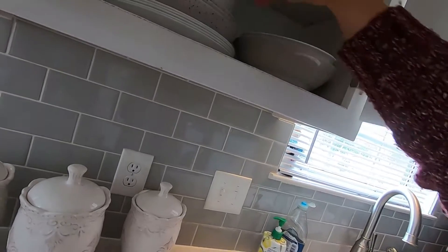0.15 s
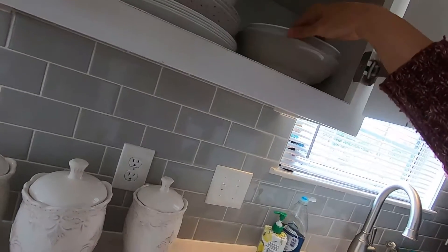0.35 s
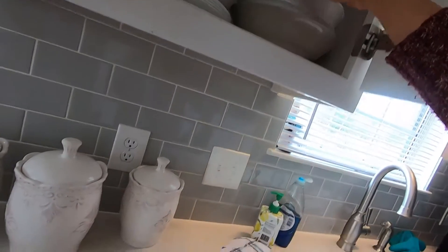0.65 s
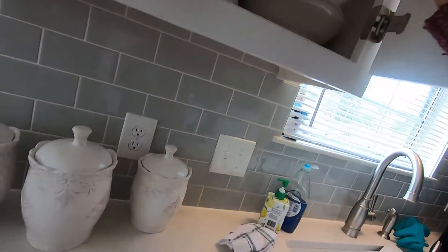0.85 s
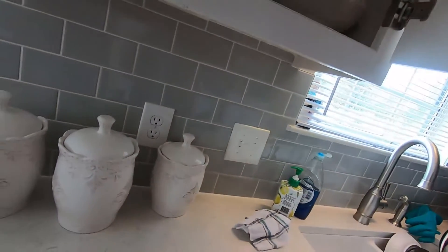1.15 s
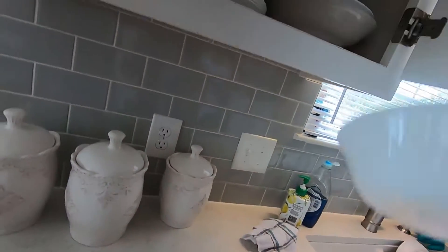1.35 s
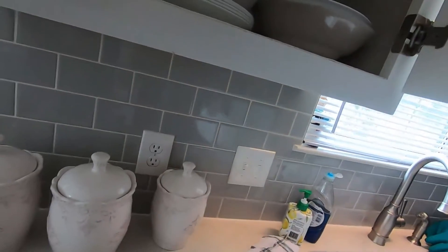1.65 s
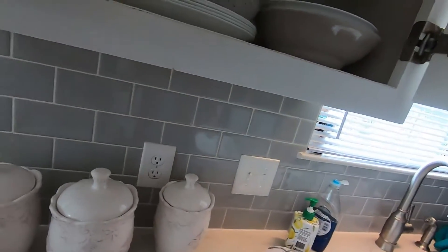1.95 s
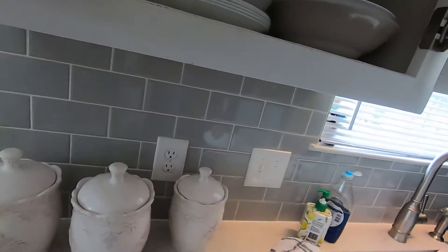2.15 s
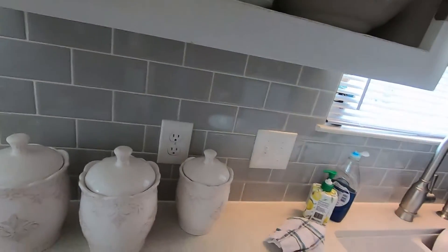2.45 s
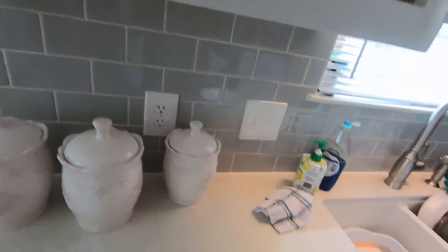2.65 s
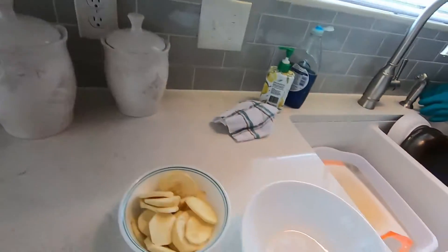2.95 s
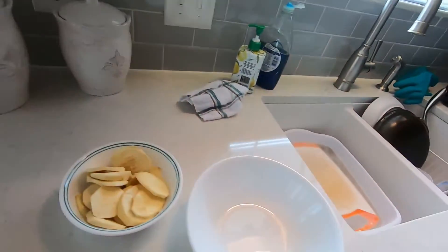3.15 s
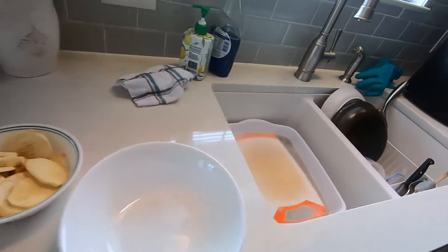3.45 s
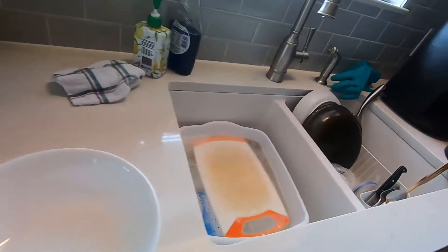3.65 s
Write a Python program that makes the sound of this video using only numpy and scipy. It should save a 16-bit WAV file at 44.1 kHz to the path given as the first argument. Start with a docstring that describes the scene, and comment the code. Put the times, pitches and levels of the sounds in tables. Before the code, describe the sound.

Ceramic crockery clinks on a shelf following hard wooden door clacks, pauses with faint handling ticks, rattles down on a countertop, then a hinge clicks and the cabinet door bangs, close up in a small reflective kitchen.

```python
"""Cabinet door, ceramic bowl and counter

A kitchen cabinet door clacks open; a ceramic bowl scrapes and clinks out of its stack and rings as it comes free.
After faint handling ticks, crockery chatters and clunks down on the counter, leaving one thin tone behind.
Something rumbles softly, a hinge clicks and the door thuds shut. Blows are coloured noise bursts plus damped
modes, answered by a small tiled room; booms are low modes; air, rubbing, rumble and drone are shaped noise."""
import sys
import numpy as np
from scipy import signal
from scipy.fft import rfft, irfft, next_fast_len
from scipy.io import wavfile

SR = 44100
rng = np.random.default_rng(int(sys.argv[2]) if len(sys.argv) > 2 else 0)


def materialize(psi):
    """Save the field psi as 16-bit PCM at rate SR to the path in sys.argv[1].

    A 1-D psi becomes a single channel; in a 2-D psi each row is a channel.
    """
    bounded = np.clip(np.atleast_2d(psi).T, -1, 1)
    quanta = np.round(bounded * 32767).astype(np.int16)
    wavfile.write(sys.argv[1], SR, quanta)


N = 167580  # samples


def amp(db):
    """Decibels to gain."""
    return 10 ** (np.asarray(db) / 20)


def unit(x):
    """Scale to rms 1."""
    return x / np.sqrt(np.mean(x ** 2) + 1e-20)


def along(points, hz):
    """Read (f/Hz, value) points on a log frequency axis."""
    f, v = np.transpose(points)
    return np.interp(np.log(hz + 1), np.log(f + 1), v)


def swell(rows):
    """Gain per sample from (t/s, level/dB) rows, silent outside them."""
    s, db = np.transpose(rows)
    return amp(np.interp(np.arange(N) / SR, s, db, left=-np.inf, right=-np.inf))


def add(track, s, sound):
    """Mix a sound into the track from time s."""
    i = max(0, round(s * SR))
    track[:, i:i + sound.shape[-1]] += sound[..., :max(0, N - i)]


def noise(colour, alike, size, tilt_db_per_oct=0):
    """Random-phase stereo noise of rms 1; the mid/side mix sets the left-right likeness per frequency."""
    hz = np.fft.rfftfreq(size, 1 / SR)
    turn = np.arccos(np.clip(along(alike, hz), -1, 1)) / 2
    octaves = np.log2(np.maximum(hz, 300))  # no tilt below 300 Hz
    gain = amp(along(colour, hz) + tilt_db_per_oct * octaves)
    spin = np.exp(2j * np.pi * rng.random((2, len(hz))))
    mid, side = irfft(spin * gain * [np.cos(turn), np.sin(turn)], size)
    return unit(np.array([mid + side, mid - side]))


def placed(x, side):
    """Lean each frequency of a sound to the left or right by level."""
    size = 2 * x.shape[-1]
    lean_db = along(side, np.fft.rfftfreq(size, 1 / SR)) / 2
    return irfft(rfft(x, size) * amp([lean_db, -lean_db]), size)[:, :x.shape[-1]]


# room decay: f/Hz, t60/s
ROOM_DECAY = [(150, 0.49), (700, 0.41), (2000, 0.44), (5000, 0.36), (10000, 0.31), (15000, 0.35)]
# left-right likeness of diffuse sound: f/Hz, likeness/1
ROOM_LIKENESS = [(200, 0.97), (600, 0.55), (1800, 0.24), (4000, .55), (8000, 0.045)]


def room(x, build_s=0.002):
    """Kitchen reverberation: a fresh diffuse tail, each frequency decaying at its own rate."""
    burst = noise([(1, 0.017), (2, 0.0083)], ROOM_LIKENESS, size=SR // 2)  # nearly white
    hz, t, z = signal.stft(burst, SR, nperseg=256)
    decay = amp(-60 * t / along(ROOM_DECAY, hz)[:, None])
    build = 1 - np.exp(-t / build_s)
    tail = signal.istft(z * decay * build, SR, nperseg=256)[1]
    return signal.fftconvolve(x, tail / np.linalg.norm(tail[0]), axes=1)[:, :x.shape[-1]]


def fade(t, t60):
    """Free exponential decay, -60 dB at t60."""
    return np.exp(-np.log(1000) * t / t60)


FREE_S = .014  # time constant of the pitch rising as a touching object frees itself
WAVER, WAVER_PER_S = 0.0029, 60  # small random pitch waver that roughens every ringing mode: share, rate


def ring(modes, t, sag, scatter_db=1.08, spread_rad=.5):
    """Damped modes that start flat by the share sag and waver; level and phase scatter at every blow."""
    out = np.zeros((2, len(t)))
    freed = 1 - sag * np.exp(-t / FREE_S)
    for hz, db, t60 in modes:
        drift = np.interp(t * WAVER_PER_S, np.arange(2 ** 7), rng.standard_normal(2 ** 7))
        cycles = rng.random() + hz * np.cumsum(freed + WAVER * drift) / SR
        phase = 2 * np.pi * cycles + spread_rad * rng.standard_normal((2, 1))  # differs per channel
        out += amp(db + scatter_db * rng.standard_normal()) * fade(t, t60) * np.sin(phase)
    return out


# left-right likeness of direct sound: f/Hz, likeness/1
DIRECT_LIKENESS = [(250, 0.96), (600, .8), (1800, 0.97), (4000, 0.8), (9000, 0.22)]
GRAIN_DB, GRAINS_PER_S = 2.5, 600  # micro-impacts inside one contact: depth, rate


def blows(rows, colour, side, room_db, attack_s, modes=(), ring_room_db=-8, hold_s=0, sag=0):
    """Each contact is a short grainy noise crack plus the object's ringing modes, heard in the room."""
    out = np.zeros((2, N))
    t = np.arange(2 ** 15) / SR
    rise = 1 - np.exp(-t / attack_s)
    for s, db, tilt, t60, *ring_db in rows:
        grain_steps = np.interp(t * GRAINS_PER_S, np.arange(len(t)), rng.standard_normal(len(t)))
        envelope = rise * unit(amp(GRAIN_DB * grain_steps)) * fade(np.maximum(t - hold_s, 0), t60)
        crack = amp(db) * envelope * noise(colour, DIRECT_LIKENESS, len(t), tilt)
        tone = amp(ring_db[0]) * rise * ring(modes, t, sag) if ring_db else 0
        reverb = room(amp(room_db) * crack + amp(ring_room_db) * tone)
        add(out, s, placed(crack + tone, side) + reverb)
    return out


def boom(rows, modes, rise_s):
    """Low wooden modes swell into each bump and die away, alike in both channels."""
    out = np.zeros(N)
    for s, db in rows:
        t = np.arange(N) / SR - s
        for hz, level, t60 in modes:
            envelope = np.exp(np.minimum(t, 0) / rise_s) * fade(np.maximum(t, 0), t60)
            out += amp(db + level) * envelope * np.sin(2 * np.pi * hz * t)
    return out


def low_cut(x, hz):
    """Third-order high-pass against the deepest bass."""
    return signal.sosfilt(signal.butter(3, hz, 'high', fs=SR, output='sos'), x)


# air: t/s, level/dB
AIR_LEVEL = [(0, -43.5), (1.46, -59.5), (1.56, -58.5), (1.9, -58.5), (3.1, -64), (3.8, -53)]
# air spectrum: f/Hz, level/dB
AIR_COLOUR = [(20, -6.5), (50, -6.5), (100, -25.5), (200, -13), (550, -29), (1200, -23), (4000, -36),
              (10000, -42), (15500, -63.5)]


def kitchen_air():
    """Quiet diffuse noise of the kitchen, its level following a table."""
    return swell(AIR_LEVEL) * noise(AIR_COLOUR, ROOM_LIKENESS, size=N)


# moving microphone: t/s, level/dB
SWAY_LEVEL = [(1.1, -68.5), (1.45, -74.5), (1.7, -42), (1.8, -65), (2.0, -62.5), (2.1, -58.5)]
# its spectrum: f/Hz, level/dB
SWAY_SPECTRUM = [(20, -11), (45, -0.5), (110, -30), (300, -55.5)]


def microphone_sway():
    """Deep rumble of the moving microphone, as low noise."""
    return swell(SWAY_LEVEL) * noise(SWAY_SPECTRUM, DIRECT_LIKENESS, size=N)


# light rubbing: t/s, level/dB
RUB_LEVEL = [(1.3, -77.5), (1.45, -59), (1.52, -78.5), (2.71, -92), (2.725, -64.5), (2.755, -64),
             (2.79, -49), (2.85, -56), (2.95, -69), (3.1, -76.5), (3.22, -56), (3.28, -67.5), (3.4, -88)]
# its spectrum: f/Hz, level/dB
RUB_SPECTRUM = [(400, -2.5), (1000, 1), (2300, -3.5), (3000, -2.5), (3900, -15), (9500, -16.5),
                (14000, -41.5)]


def rubbing():
    """Light rubbing: diffuse noise swelling and fading."""
    return swell(RUB_LEVEL) * noise(RUB_SPECTRUM, ROOM_LIKENESS, size=N)


# soft rumble: t/s, level/dB
RUMBLE_LEVEL = [(2.715, -77), (2.74, -32.5), (2.81, -27), (2.86, -27.5), (2.9, -41), (3.03, -59)]
# its spectrum: f/Hz, level/dB
RUMBLE_SPECTRUM = [(20, 4.5), (42, -0.5), (125, 8.5), (175, -13.5), (450, -18), (700, -60.5)]


def rumble():
    """Soft rumble: low noise under a short swell."""
    return swell(RUMBLE_LEVEL) * noise(RUMBLE_SPECTRUM, DIRECT_LIKENESS, size=N)


# handling ticks: t/s, level/dB, pitch f/Hz
HANDLING_TICKS = [(.428, -36.5, 2900), (1.117, -42, 3900), (1.1271, -32, 1600), (1.2512, -38, 1340),
                  (1.3384, -46.5, 4800), (1.4444, -48, 5300), (1.6058, -34.5, 1360), (1.6687, -43, 9820),
                  (1.6919, -46, 9350), (1.7905, -44.5, 2900), (1.8188, -47.5, 2000), (3.526, -44.5, 3740),
                  (3.633, -41.5, 2370)]
# tick spectrum: f/pitch, level/dB
TICK_SPECTRUM = [(.13, -16.5), (.5, -19.5), (.8, -9), (1, 0), (1.4, -10.5), (4, -24), (10, -32)]
# lean of the hand: f/Hz, left minus right/dB
HAND_LEAN = [(1500, -13.5), (10000, -7)]


def ticks(t60=0.027):
    """Faint close ticks, each a brief noise band around its own pitch."""
    out = np.zeros((2, N))
    for s, db, hz in HANDLING_TICKS:
        colour = [(hz * k, level) for k, level in TICK_SPECTRUM]
        out += blows([(s, db, 0, t60)], colour, HAND_LEAN, room_db=-8, attack_s=0.0024)
    return out


# soft knock: t/s, level/dB, tilt/(dB/oct), t60/s
KNOCK = [(2.7205, -30.5, -1.5, 0.14)]
# its spectrum: f/Hz, level/dB
KNOCK_COLOUR = [(120, -10), (250, -17), (420, 4.5), (650, -23), (850, -12), (1500, -37.5), (6000, -58)]
# lean near the middle, also of rim, foot and hinge: f/Hz, left minus right/dB
CENTRE_LEAN = [(500, 0.5), (2000, -2)]


def soft_knock():
    """Dull noise crack that runs into the rumble."""
    return blows(KNOCK, KNOCK_COLOUR, CENTRE_LEAN, room_db=-2.5, attack_s=0.00059)


# swinging door: t/s, level/dB
SWING_LEVEL = [(3.28, -69), (3.305, -45), (3.39, -40), (3.42, -47), (3.5, -59.5), (3.6, -87)]
# its spectrum: f/Hz, level/dB
SWING_SPECTRUM = [(60, -77), (140, 17.5), (180, -7), (400, -19), (1200, -72)]


def door_swing():
    """Low drone of the swinging door, as narrow low noise."""
    return swell(SWING_LEVEL) * noise(SWING_SPECTRUM, DIRECT_LIKENESS, size=N)


# hinge clicks: t/s, level/dB, tilt/(dB/oct), t60/s
HINGE_CLICKS = [(3.2915, -34, 3.5, 0.073), (3.325, -41.5, -7, 0.1), (3.368, -43, -4, 0.13)]
# their spectrum: f/Hz, level/dB
HINGE_SPECTRUM = [(120, -38), (200, -16), (440, -5.5), (487, -12), (1390, -12.5), (2280, -22),
                  (3000, -16.5), (12000, -73.5)]


def hinge():
    """Hinge clicks: short noise cracks without ringing modes."""
    return blows(HINGE_CLICKS, HINGE_SPECTRUM, CENTRE_LEAN, room_db=-1.5, attack_s=0.0019)


# lingering bowl tone: t/s, rms level/dB
HUM_LEVEL = [(2.38, -65), (2.7, -57), (3.3, -58), (3.5, -62.5), (3.65, -85)]
HUM_HZ = 839


def bowl_hum():
    """Lingering tone of the bowl: one sine, alike in both channels."""
    tone = np.sqrt(2) * np.sin(2 * np.pi * HUM_HZ * np.arange(N) / SR)  # rms 1
    return swell(HUM_LEVEL) * tone


# dish on the counter: t/s, level/dB, tilt/(dB/oct), t60/s, ring/dB
DISH_CHATTER = [(2.0585, -33, -0.5, 0.076, -39), (2.0698, -7.5, 2.5, 0.013, -19.5),
                (2.0762, -19, -5, 0.11, -16.5), (2.145, -13, 2, 0.05, -22.5),
                (2.151, -8.5, -4.5, 0.026, -29), (2.175, -24, 1, 0.12, -26.5),
                (2.2, -14.5, -1.5, 0.018, -29), (2.222, -25.5, 0.5, 0.1, -34.5)]
# crack spectrum of dish and rim: f/Hz, level/dB
DISH_COLOUR = [(65, -30), (110, -23.5), (165, -17), (260, -22.5), (626, -22.5), (760, -7.5), (1430, -8.5),
               (1590, -5.5), (2080, -23), (3020, -28.5), (3950, -48.5), (5170, -39), (6910, -48),
               (7510, -36.5), (14000, -57.5), (15500, -86)]
# dish: f/Hz, level/dB, t60/s
DISH_PARTIALS = [(756, -17, 0.36), (897, -11.5, 0.55), (1170, -12.5, .35), (1468, -11, 0.18),
                 (1536, -11.5, 0.41), (1596, 0.5, 0.4), (1665, -11, 0.32), (6270, -29.5, 0.14),
                 (7530, -30, 0.32), (9000, -34, 0.41)]
# lean of the dish: f/Hz, left minus right/dB
COUNTER_LEAN = [(200, 1.5), (1500, -8), (8000, 1.5)]


def dish_chatter():
    """A dish chatters on the counter: quick cracks, each ringing the dish modes."""
    return blows(DISH_CHATTER, DISH_COLOUR, COUNTER_LEAN, room_db=0.5, attack_s=0.0006,
                 modes=DISH_PARTIALS, ring_room_db=-7.0)


# chatter on the rim: t/s, level/dB, tilt/(dB/oct), t60/s, ring/dB
RIM_CONTACTS = [(2.169, -24, 1, 0.058, -39.5), (2.188, -24, -19.5, 0.094, -45)]
# rim: f/Hz, level/dB, t60/s
RIM_PARTIALS = [(3074, 3.5, 0.19), (5250, -7, 0.26), (7370, -2.5, 0.24)]


def rim_taps():
    """The chatter catches the rim and rings its high modes."""
    return blows(RIM_CONTACTS, DISH_COLOUR, CENTRE_LEAN, room_db=-2, attack_s=0.0029, modes=RIM_PARTIALS)


# bowl's foot on the counter: t/s, level/dB, tilt/(dB/oct), t60/s, ring/dB
FOOT_CLUNKS = [(2.3812, -11.5, -0.5, 0.1, -23), (2.4168, -16, 0.9, 0.059, -24)]
# crack spectrum: f/Hz, level/dB
FOOT_COLOUR = [(65, -18), (110, -26.5), (553, -6.5), (820, -10.5), (1030, -10), (1660, -19), (3710, -24.5),
               (4210, -33.5), (7510, -33.5), (13400, -50), (15500, -60)]
# foot: f/Hz, level/dB, t60/s
FOOT_PARTIALS = [(159.3, -5, 0.24), (353, -18, 0.58), (528, -12, 0.31), (733, 2.5, 0.13), (731, 3.5, 0.19),
                 (984, 2, 0.26), (1140, -11.5, 0.38), (5650, -10, 0.054), (7480, -16, 0.13),
                 (9300, -20.5, 0.17)]


def foot_clunk():
    """The bowl's foot clunks down: two cracks ringing low and high modes."""
    return blows(FOOT_CLUNKS, FOOT_COLOUR, CENTRE_LEAN, room_db=-4, attack_s=0.0028,
                 modes=FOOT_PARTIALS, ring_room_db=-9.5)


# shelf under the stack: t/s, level/dB
SHELF_KNOCKS = [(.55, -27), (.895, -25)]
# shelf: f/Hz, level/dB, t60/s
SHELF_PARTIALS = [(141, 1, 0.46), (187, 2.5, 0.37), (217, -9, 0.1), (306, -7.5, 0.45)]


def shelf():
    """The shelf under the stack booms in its low modes."""
    return boom(SHELF_KNOCKS, SHELF_PARTIALS, rise_s=0.0034)


# bowl below is struck: t/s, level/dB, tilt/(dB/oct), t60/s, ring/dB
LOWER_STRIKES = [(.556, -18.5, -3.5, 0.25, -28), (.902, -19.5, -0.5, 0.18, -17),
                 (.967, -32.5, -0.5, 0.34, -33)]
# bowl below: f/Hz, level/dB, t60/s
LOWER_PARTIALS = [(1640, -11, 0.46), (2093, -5.5, .58), (2120, -12.5, .4), (2780, -14, .42),
                  (3340, -15, 0.18), (4587, -14.5, .33)]
# crack spectrum of both bowls: f/Hz, level/dB
BOWL_COLOUR = [(59, -34), (100, -5.5), (181, -7.5), (487, -12.5), (640, -7.5), (808, -6), (1110, -4),
               (1520, -5.5), (1920, 0.5), (2220, -4), (4460, -7.5), (6810, -19.5), (9540, -16.5),
               (12800, -37), (15500, -42.5)]
# lean of the cabinet, its bowls and its door: f/Hz, left minus right/dB
CABINET_LEAN = [(200, 0), (700, 4), (2000, 0), (4000, 2.5), (8000, 6.5)]


def lower_bowl():
    """The struck bowl below rings on in higher, longer modes."""
    return blows(LOWER_STRIKES, BOWL_COLOUR, CABINET_LEAN, room_db=-9.5, attack_s=0.0011,
                 modes=LOWER_PARTIALS, ring_room_db=-13)


# bowl against the stack: t/s, level/dB, tilt/(dB/oct), t60/s, ring/dB
BOWL_CLINKS = [(.4703, -24.5, 0.94, 0.06, -43.5), (.494, -25.5, -2, 0.27, -49), (.522, -24, -3, 0.2, -48),
               (.5425, -10, 1.3, 0.12, -32), (.569, -23.5, -6, 0.091, -37.5), (.7715, -22, -1.5, 0.07, -42),
               (.787, -19.5, -1, 0.07, -40), (.829, -25, -0.5, 0.08, -19.5), (.851, -40.5, 0.5, 0.05, -31),
               (.874, -9, 0, 0.041, -5.5), (.949, -27, -3, 0.13, -27)]
# bowl: f/Hz, level/dB, t60/s
BOWL_PARTIALS = [(658, -2, 0.16), (717, -11.5, 0.26), (1125, -4, 0.087), (1237, -7.5, 0.14),
                 (3674, -13.5, .18)]
SAG = .045  # share by which the touching bowl starts flat


def lifted_bowl():
    """The bowl knocks its way out; the pitch of each ring rises as it comes free."""
    return blows(BOWL_CLINKS, BOWL_COLOUR, CABINET_LEAN, room_db=-7.5, attack_s=0.0013,
                 modes=BOWL_PARTIALS, ring_room_db=-7.0, hold_s=0.0037, sag=SAG)


# door clacks: t/s, level/dB, tilt/(dB/oct), t60/s, ring/dB, panel boom/dB
DOOR_CLACKS = [(.0097, -10, .5, 0.059, -21.5, -12), (0.092, -14.5, -2, 0.068, -26, -32),
               (0.1804, -16.5, 0.5, 0.022, -36.5, -24.5), (0.1899, -10, 1.5, 0.018, -21, -11)]
# crack spectrum: f/Hz, level/dB
DOOR_COLOUR = [(71, -36), (125, -10), (250, -4), (420, -12.5), (690, -20), (870, -5), (1050, -17.5),
               (1300, -9.5), (1650, -13.5), (1900, -13), (2240, -17), (5100, -23), (9200, -28.5),
               (15500, -54.5)]
# door: f/Hz, level/dB, t60/s
DOOR_PARTIALS = [(897, -5.5, .12), (1156, -11, 0.35), (1364, -8.5, 0.37), (1533, -4, 0.2), (1953, -7, 0.17),
                 (2580, -5.5, 0.14), (3087, -9.5, .24), (3920, -12.5, 0.067), (4086, -7, 0.12)]
# door panel: f/Hz, level/dB, t60/s
PANEL_PARTIALS = [(139, -8.5, 0.28), (163.7, -0.5, 0.17), (204.6, -3.5, 0.13), (242.7, -8.5, 0.22),
                  (303, -13, 0.19)]


def door_opening():
    """Hard clacks ring the door and set its panel booming."""
    clacks = blows(DOOR_CLACKS, DOOR_COLOUR, CABINET_LEAN, room_db=-5.5, attack_s=0.00042,
                   modes=DOOR_PARTIALS, ring_room_db=-9, hold_s=0.0045)
    bumps = [(row[0] + 0.0028, row[-1]) for row in DOOR_CLACKS]  # boom peaks 2.8 ms later
    return clacks + boom(bumps, PANEL_PARTIALS, rise_s=0.0055)


# door meets its frame: t/s, level/dB, tilt/(dB/oct), t60/s
SLAM_CONTACTS = [(3.675, -31.5, 1.5, 0.052), (3.6838, -9.5, -1, 0.035), (3.705, -29.5, 5, 0.054)]
# crack spectrum: f/Hz, level/dB
SLAM_SPECTRUM = [(300, -0.5), (700, -1.5), (1100, -3), (1800, -4), (2350, 0), (2900, -8), (4000, -10),
                 (5500, -16), (9500, -24.5), (15500, -48)]
# thud: t/s, level/dB
THUD_BUMP = [(3.682, -1.5)]
# cabinet: f/Hz, level/dB, t60/s
CABINET_PARTIALS = [(93, -3, 0.34), (147.7, -1.5, 0.27), (197.7, -9, 0.26)]
# dense boom: t/s, level/dB
BOOM_LEVEL = [(3.6, -53), (3.66, -36), (3.682, -14), (3.8, -26)]
# its spectrum: f/Hz, level/dB
BOOM_SPECTRUM = [(30, -21), (110, -3), (165, 4), (310, -14.5), (700, -43.5), (7000, -120)]


def door_slam():
    """The door thuds into the cabinet: noise cracks, low modes and a dense noise boom."""
    slam = blows(SLAM_CONTACTS, SLAM_SPECTRUM, CABINET_LEAN, room_db=-2.0, attack_s=0.000567)
    thud = boom(THUD_BUMP, CABINET_PARTIALS, rise_s=0.0043)
    dense_boom = swell(BOOM_LEVEL) * noise(BOOM_SPECTRUM, DIRECT_LIKENESS, size=N)
    return slam + thud + dense_boom


LOW_CUT_HZ = 81.5  # keeps the sharp attacks of door opening, stack and counter free of deep bass


def scene():
    """All sources over the quiet air; opening, stack and counter pass the low cut."""
    background = kitchen_air() + microphone_sway()
    handling = rubbing() + rumble() + ticks() + soft_knock()
    counter = bowl_hum() + dish_chatter() + rim_taps() + foot_clunk()
    stack = shelf() + lower_bowl() + lifted_bowl()
    closing = door_swing() + hinge() + door_slam()
    return background + handling + closing + low_cut(counter + stack + door_opening(), LOW_CUT_HZ)


TOP_HZ = 15700


def record(dry):
    """The recorder rounds off peaks near full scale and keeps nothing above its band limit."""
    x = dry / (1 + np.abs(dry) ** 6) ** (1 / 6)
    size = next_fast_len(N + SR // 2)
    in_band = np.fft.rfftfreq(size, 1 / SR) < TOP_HZ
    return irfft(rfft(x, size) * in_band, size)[:, :N]


dry = scene()
out = record(dry)
materialize(out)
```